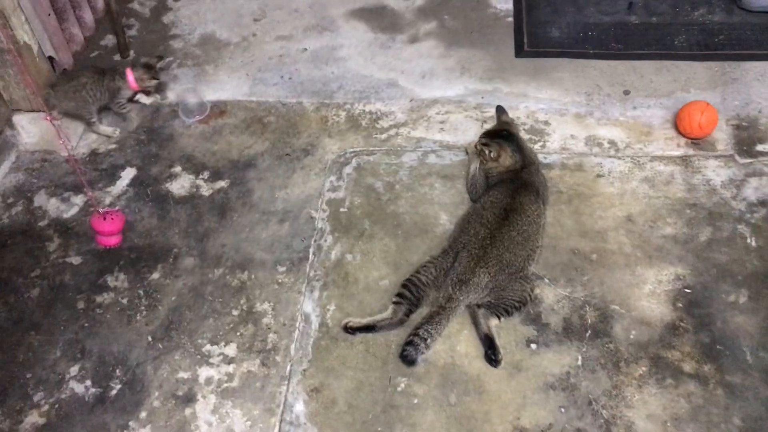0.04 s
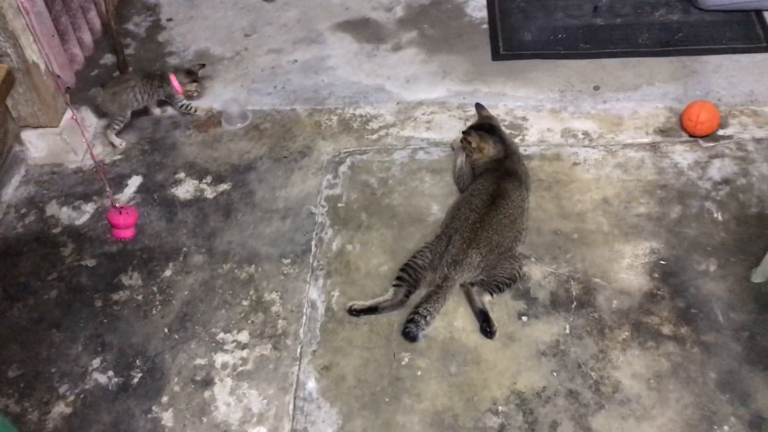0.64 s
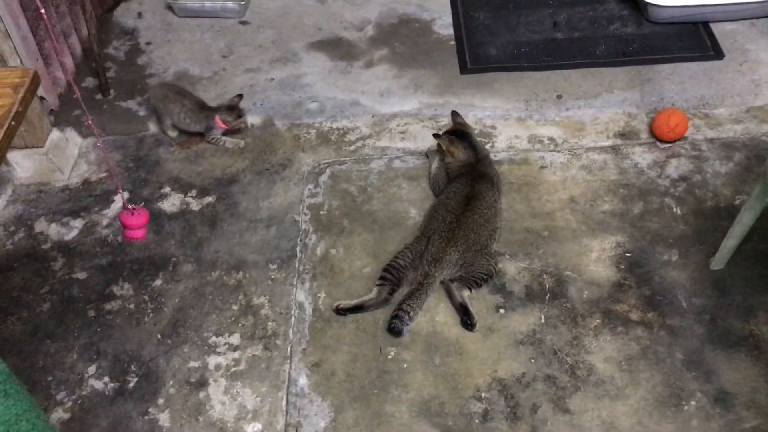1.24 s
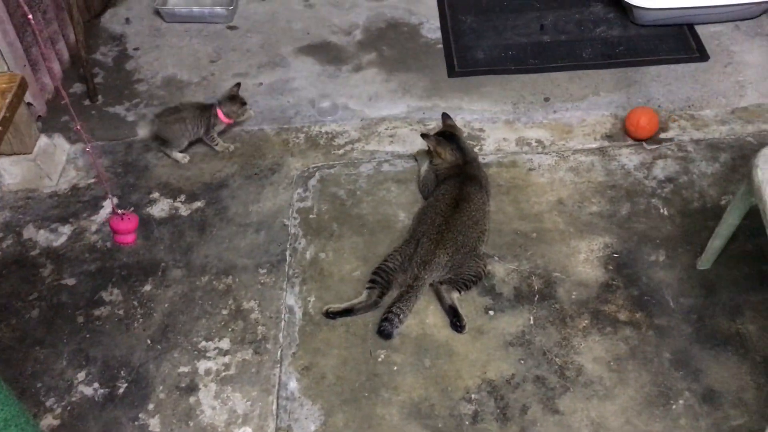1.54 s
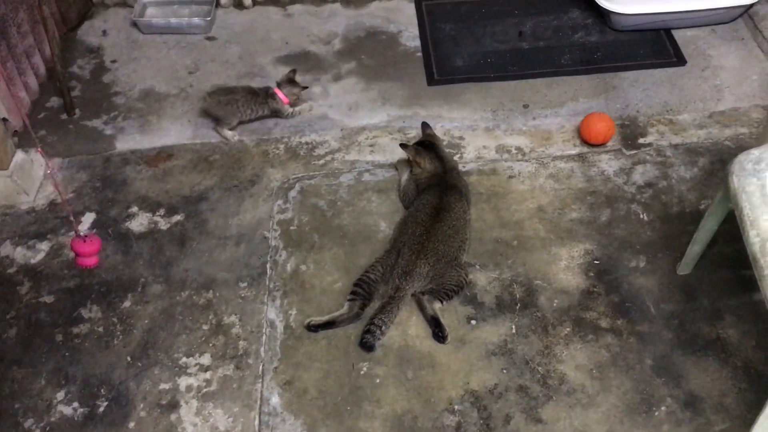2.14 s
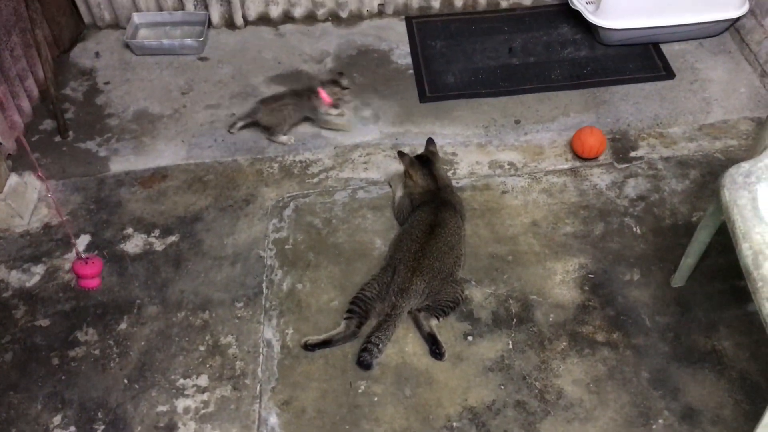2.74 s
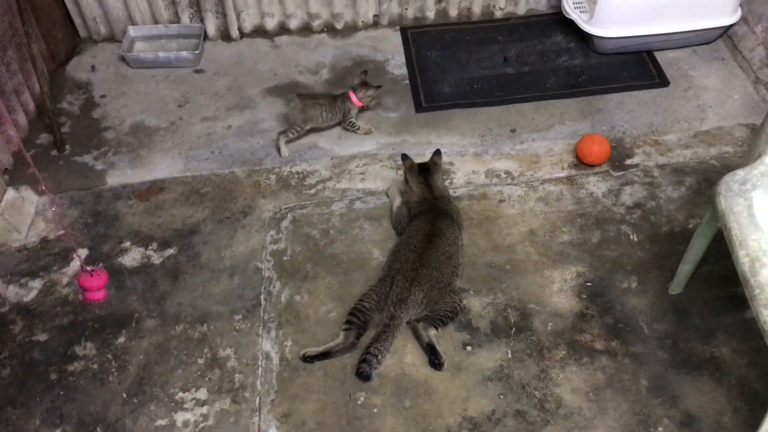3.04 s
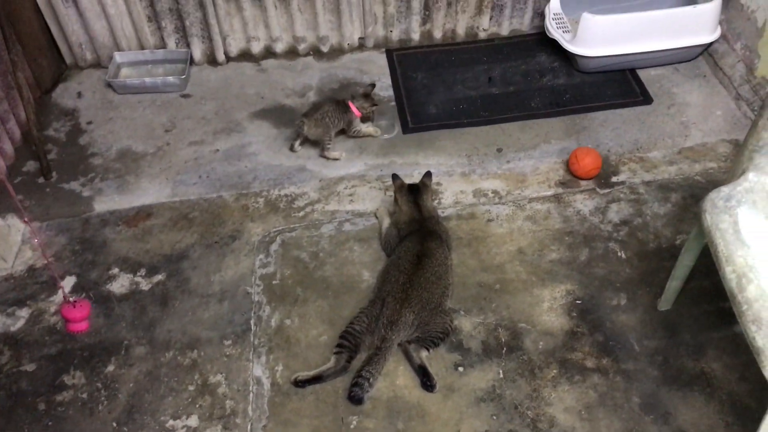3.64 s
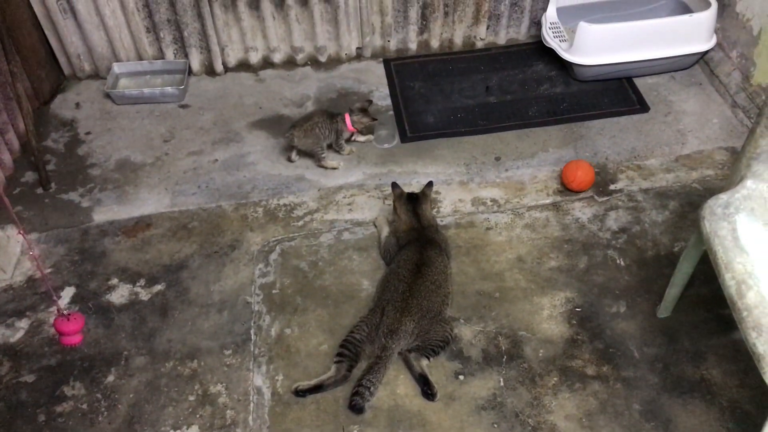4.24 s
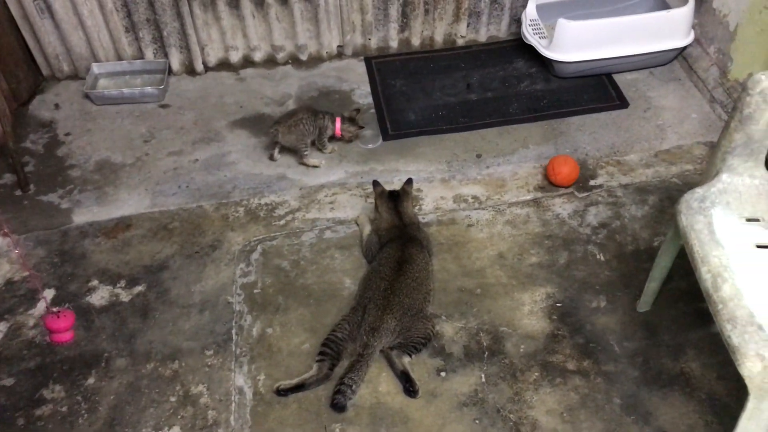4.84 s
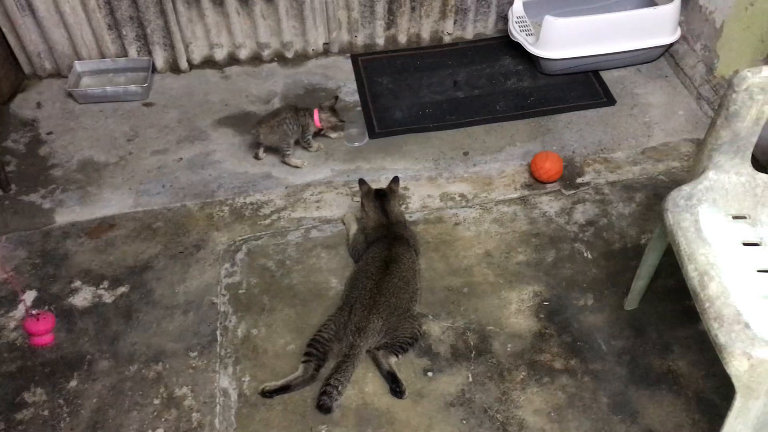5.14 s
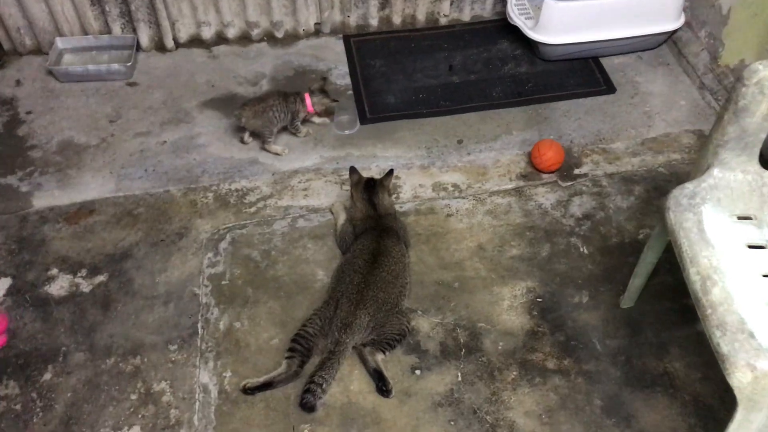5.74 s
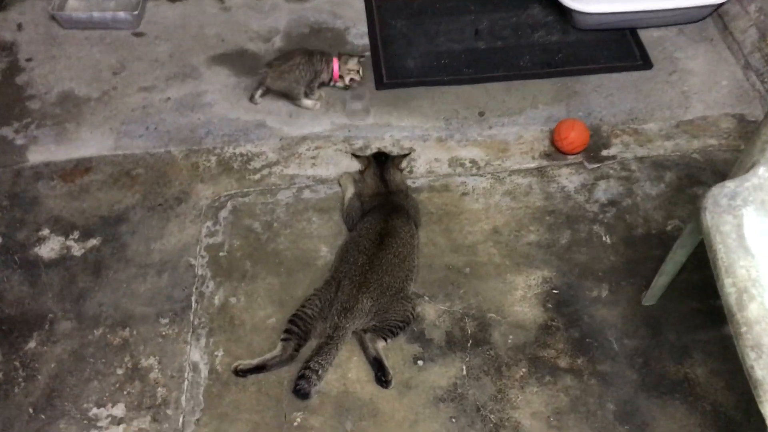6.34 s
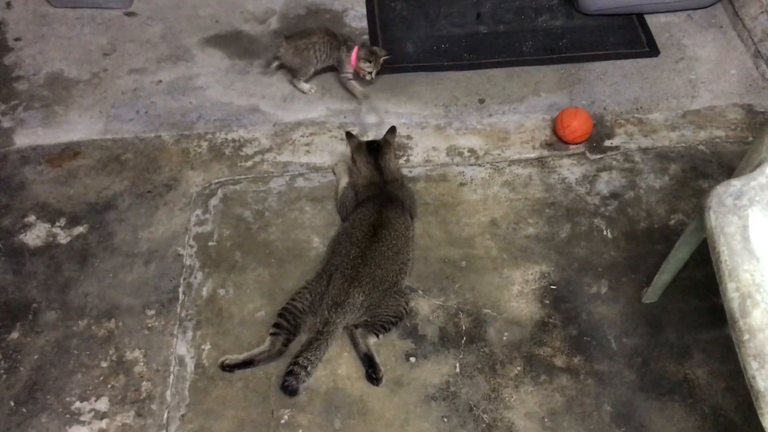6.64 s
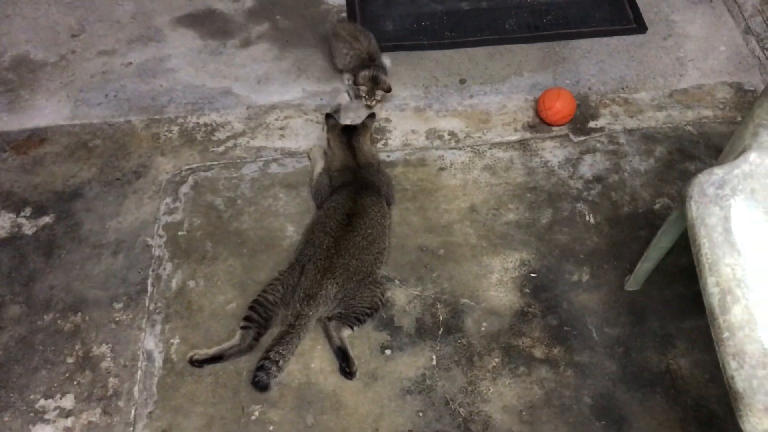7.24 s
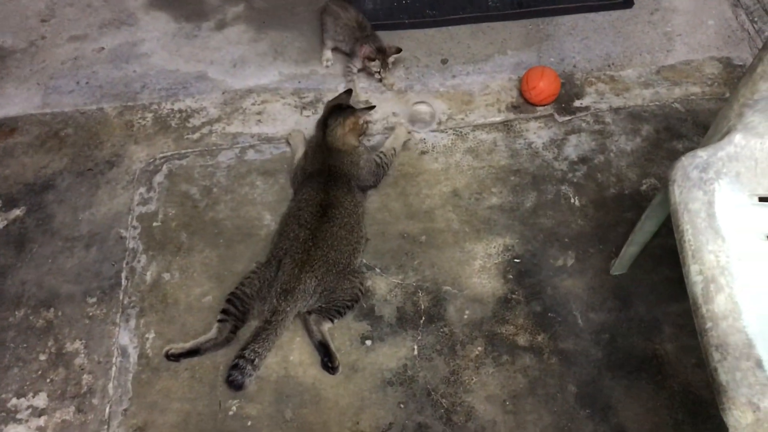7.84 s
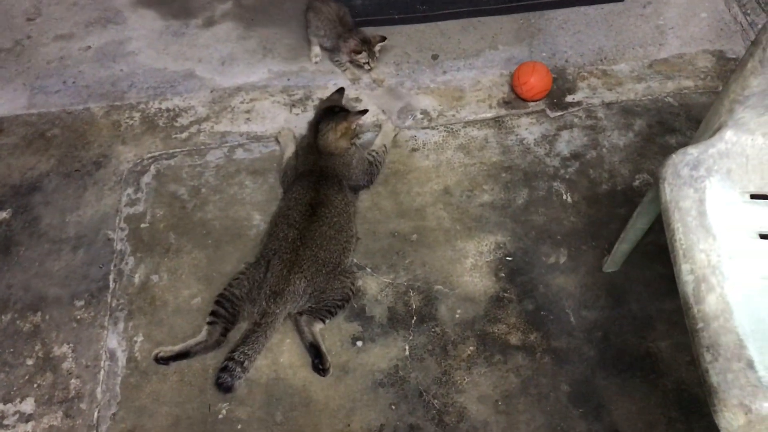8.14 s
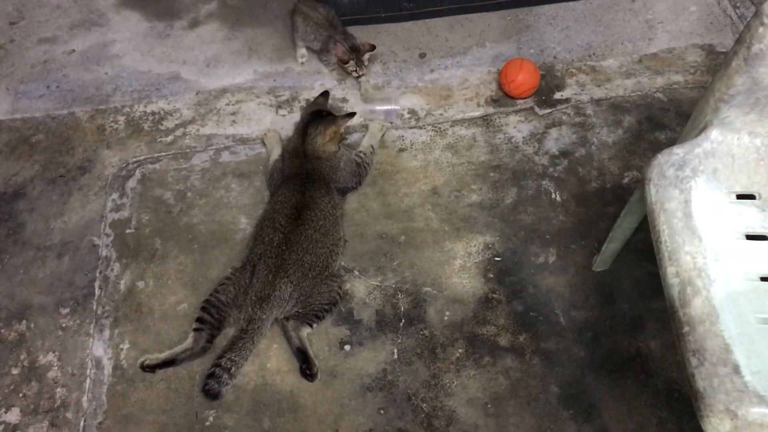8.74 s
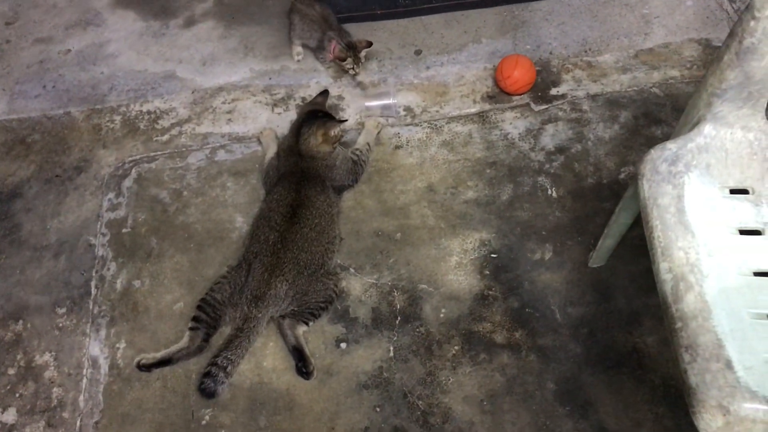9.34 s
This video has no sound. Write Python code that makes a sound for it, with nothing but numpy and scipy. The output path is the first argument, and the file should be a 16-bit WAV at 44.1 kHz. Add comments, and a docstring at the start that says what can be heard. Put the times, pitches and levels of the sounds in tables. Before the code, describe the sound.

A kitten bats a light plastic stick over concrete with scuffs, taps and claw ticks, while crickets chirp in the night.

```python
"""Kitten and stick on a night porch

A kitten pushes and bats a light hollow plastic stick over concrete: gritty scuffs, taps, claw ticks.
At last the stick is flipped and clatters down; the close walls of the roofed porch echo each contact.
A cricket chirps in threes, each wing stroke falling in pitch, over other insects, traffic and a hum."""
import sys
import numpy as np
from scipy import signal
from scipy.fft import rfft, irfft, next_fast_len
from scipy.io import wavfile
from scipy.ndimage import uniform_filter1d, map_coordinates

SR = 44100
rng = np.random.default_rng(int(sys.argv[2]) if len(sys.argv) > 2 else 0)


def bounce(signal):
    """Save signal as a 16-bit WAV file at the path given by the first command-line argument."""
    frames = np.transpose(np.atleast_2d(signal))
    limited = np.clip(frames, -1, 1)
    pcm = np.round(limited * 32767).astype(np.int16)
    wavfile.write(sys.argv[1], SR, pcm)


N = 413658

# Paw shoves. Each row: start, rise and length in seconds, relative ring and grit in dB, ring pitch in Hz.
SHOVES = [(0.168, 0.01, 0.058, -41, -50, 1170), (0.272, 0.0089, 0.042, -45, -54, 1080),
          (0.395, 0.015, 0.039, -45, -48, 1020), (0.487, 0.01, 0.067, -51, -72, 1130),
          (0.615, 0.0052, 0.047, -42, -45, 1195), (0.694, .006, 0.087, -39.5, -53, 1194),
          (0.847, 0.022, 0.14, -41.5, -44.5, 1065), (1.072, 0.0073, 0.069, -34.5, -38.5, 1170),
          (1.189, 0.014, 0.049, -43, -46.5, 1130), (1.273, 0.0043, 0.22, -38, -45, 1272),
          (1.836, .016, 0.072, -40, -46.5, 1310), (1.962, 0.0084, 0.048, -37, -50, 1170),
          (2.107, 0.036, 0.11, -39.5, -46, 1070), (2.268, 0.014, 0.064, -45.5, -60, 1025),
          (2.421, 0.037, 0.055, -37.5, -45, 1050), (2.499, 0.0088, .17, -40, -51, 1110),
          (2.689, 0.022, 0.14, -40, -46, 1087), (2.867, 0.0072, 0.098, -37.5, -45, 1203),
          (3.072, 0.009, .022, -29.5, -42, 1124), (3.129, 0.015, 0.031, -35, -46, 1176),
          (3.258, 0.0039, 0.0075, -28, -46, 1127), (3.399, 0.0039, 0.0069, -29, -44, 1215),
          (3.471, .006, 0.031, -35.5, -49.5, 1216), (3.596, 0.0044, 0.037, -39, -57, 1140),
          (3.715, 0.014, 0.022, -48, -59.5, 1050), (4.15, 0.027, 0.09, -50.5, -64, 1000),
          (4.476, 0.022, 0.038, -47.5, -60, 990), (4.745, 0.023, .055, -39, -55, 1014),
          (5.188, .014, .016, -56.5, -67, 980), (5.422, 0.026, 0.031, -35, -47, 990),
          (5.666, 0.0076, 0.012, -50.5, -64, 1010), (5.72, 0.022, 0.02, -55, -75, 980),
          (5.906, 0.026, 0.051, -34.5, -43.5, 1080), (6.25, 0.016, .062, -38, -45.5, 1045),
          (6.397, 0.009, 0.048, -37, -53, 1220), (6.567, .015, 0.12, -41, -54, 1340),
          (6.719, 0.0093, 0.073, -38.5, -49.5, 1160), (6.96, 0.018, 0.12, -47, -53, 1056),
          (7.124, 0.021, 0.088, -40, -50.5, 1050), (7.327, 0.0095, 0.051, -35.5, -43.5, 1130),
          (7.404, 0.013, .205, -37, -46.5, 1180), (7.806, 0.0064, 0.015, -36.5, -49, 1200)]
# Spectra of a contact's body, of grit and of a claw. Each row: frequency in Hz, relative density in dB.
BODY_SPECTRUM = [(420, -14), (560, 5.5), (700, 6.5), (830, 3.5), (1150, 15), (1480, 10.5), (1750, 4),
                 (2300, -7), (3200, -23.5)]
GRIT_SPECTRUM = [(1290, -31), (2200, -11), (3270, -9), (3550, -7.5), (3860, -6), (5630, 1.5), (6270, -3),
                 (8370, -10.5), (10500, -22), (13500, -22.5), (15800, -30)]
CLAW_SPECTRUM = [(600, 2), (1400, 4.5), (2500, -1), (4000, 1.5), (6000, 1.5), (9000, -1.5), (10500, -7),
                 (13000, -8), (15800, -17)]


def scuffs():
    """Each shove is a hail of catches that rings the stick; coarser grains crack under it."""
    out = np.zeros(N)
    for start_s, rise_s, length_s, ring_db, grit_db, pitch_hz in SHOVES:
        ring_gain, grit_gain = slide_gains(rise_s, length_s, ring_db, grit_db)
        samples = len(ring_gain)
        drag = catches(samples, per_s=1400, spread_db=4)
        fine = unit(catches(samples, per_s=1100, spread_db=4))
        coarse = unit(catches(samples, per_s=110, spread_db=-1))
        crunch = fine + amp(-4) * coarse
        ring = unit(hollow_ring(drag, pitch_hz, width_hz=128))
        body = amp(-2) * ring + amp(-7.5) * coloured(crunch, BODY_SPECTRUM)
        add(out, start_s, ring_gain * body + amp(3) * grit_gain * coloured(crunch, GRIT_SPECTRUM))
    return out


def taps():
    """A paw knocks the stick on the floor; held down, it rings briefly just above the nearest shove."""
    # Each row: start in seconds, relative level in dB, grit balance in dB.
    knocks = [(0.228, -37, -22), (0.625, -24.5, -10), (0.698, -25, -4), (0.867, -29, -17), (1.123, -34, 9),
              (1.146, -27, -18), (1.176, -21, -11), (1.192, -27.5, -8), (1.277, -24.5, -8.5),
              (1.344, -31.5, -1), (1.9, -29, -16), (1.971, -26.5, -7.5), (2.185, -29.5, -6),
              (2.504, -24.5, -18), (2.534, -24.5, -9.5), (2.877, -29, -8), (2.893, -21, -8),
              (3.05, -27.5, -15), (3.077, -20.5, -12), (3.262, -20, -11), (3.401, -25.5, -7),
              (3.467, -17, -13.5), (3.601, -25, -9.5), (4.811, -37, -21), (6.262, -32.5, -15),
              (6.406, -30.5, -3.5), (6.718, -25.5, -2), (6.77, -32.5, -7), (7.337, -30, -3),
              (7.809, -33, -15), (7.907, -27.5, -15)]
    low_cut = signal.butter(2, 750, "high", fs=SR, output="sos")  # too small to radiate bass
    out = np.zeros(N)
    for start_s, level_db, grit_db in knocks:
        nearest_shove = min(SHOVES, key=lambda shove: abs(shove[0] - start_s))
        pitch_hz = 1.045 * nearest_shove[-1]  # a firm paw raises the pitch
        blow = porch(contact(t60_s=0.007), tail_db=-1, early_db=1)
        bite = porch(contact(t60_s=0.0092), tail_db=0, early_db=2.5)
        ring = signal.sosfilt(low_cut, hollow_ring(blow, pitch_hz, width_hz=300, skirt_hz=400))
        body = peaked(ring) + amp(-8.5) * peaked(coloured(bite, BODY_SPECTRUM))
        grit = amp(grit_db + 5.5) * peaked(coloured(bite, GRIT_SPECTRUM))
        add(out, start_s, amp(level_db - 2.5) * (body + grit))
    return out


def claw_ticks():
    """Claws and loose grains click on concrete; the finer the point, the brighter."""
    # Each row: start in seconds, relative level in dB, tilt in dB per octave.
    ticks = [(0.1722, -36, 4), (0.4314, -30.5, -4), (0.79, -33, -1), (0.849, -31, 6), (1.0994, -32, 7),
             (1.8363, -31, 7), (1.9245, -30.5, -2.5), (2.4107, -33.5, 1.5), (2.69, -29, 6.5),
             (2.8448, -27, 5.5), (3.075, -28, 9), (3.437, -29.5, 2), (3.5048, -27.5, 0), (4.1535, -42, 8),
             (5.427, -36, 8), (5.9707, -34.5, 0), (6.315, -29, 0.5), (6.6197, -29, -1), (6.6448, -27, 4),
             (6.6824, -29.5, -0.5), (6.7211, -34, 3), (6.9606, -32.5, 8), (7.1636, -39, 7),
             (7.335, -30, 11), (8.2286, -39.5, 9), (8.312, -44, 8), (8.4158, -32, 2.5), (9.193, -39, 4.5)]
    out = np.zeros(N)
    for start_s, level_db, tilt in ticks:
        click = porch(contact(t60_s=0.017), tail_db=3, early_db=-2.5)
        spectrum = [(hz, db + tilt * np.log2(hz / 8000)) for hz, db in CLAW_SPECTRUM]
        add(out, start_s, amp(level_db - 1.5) * peaked(coloured(click, spectrum)))
    return out


def clatter(roll_corner_hz=1280):
    """Dropped free, the stick rings in all its modes, then rattles and rolls to rest."""
    # Each row: start in seconds, relative level in dB.
    bounces = [(7.8495, -21), (7.8563, -20), (7.861, -23)]
    # Each row: start, rise and length in seconds, relative ring and grit in dB.
    rolls = [(7.87, .01, 0.056, -40, -48.5), (8.009, 0.018, 0.11, -46, -65),
             (8.228, 0.0023, 0.0075, -49.5, -58.5), (8.292, 0.0037, .02, -54.5, -69),
             (8.42, 0.0028, .03, -62, -54), (8.691, 0.021, 0.11, -71, -56.5)]
    out = np.zeros(N)
    for start_s, level_db in bounces:
        blow = porch(contact(t60_s=0.0034), tail_db=1.5, early_db=-0.5)
        ring = peaked(filtered(blow, free_modes))
        click = peaked(coloured(blow, CLAW_SPECTRUM))
        add(out, start_s, amp(level_db - 1) * (ring + amp(-3.5) * click))
    for start_s, rise_s, length_s, ring_db, grit_db in rolls:
        ring_gain, grit_gain = slide_gains(rise_s, length_s, ring_db, grit_db)
        rattle = catches(len(ring_gain), per_s=260, spread_db=1)
        # Light contacts hardly wake the low modes.
        ring = unit(filtered(rattle, lambda hz: free_modes(hz) * np.minimum(hz / roll_corner_hz, 1)))
        grit = coloured(rattle, CLAW_SPECTRUM)
        add(out, start_s, amp(-0.5) * ring_gain * ring + amp(4) * grit_gain * grit)
    return out


def free_modes(hz):
    """Response of the free stick: resonances of alternating sign."""
    # Each row: centre in Hz, width in Hz, gain in dB.
    modes = [(470, 73, -8), (647, 53, 7), (1200, 220, 1.5), (1550, 126, 5), (1760, 230, -0.5),
             (2920, 400, -5.5), (3900, 480, -16), (4550, 240, -5), (5530, 1440, -11), (10000, 480, -30)]
    return sum((-1) ** k * amp(db) * 1j * hz * width / (centre ** 2 - hz ** 2 + 1j * hz * width)
               for k, (centre, width, db) in enumerate(modes))


def hollow_ring(force, pitch_hz, width_hz, skirt_hz=330):
    """The stick's hollow resonance; its pitch depends on how it lies and is held."""
    carrier = np.exp(2j * np.pi * np.cumsum(np.full(len(force), pitch_hz)) / SR)
    lowpass = np.vstack([signal.butter(1, hz, fs=SR, output="sos") for hz in (width_hz / 2, skirt_hz)])
    return (signal.sosfilt(lowpass, force / carrier) * carrier).real


def slide_gains(rise_s, length_s, ring_db, grit_db):
    """Ring and grit swell, sag as the stick slows, then die with the echo; the grit leads."""
    t = np.arange(0, length_s + 0.25, 1 / SR)
    swell = np.minimum(t / max(rise_s, 1 / SR), 1)
    sliding_s = np.maximum(np.minimum(t, length_s) - rise_s, 0)
    stopped_s = np.maximum(t - length_s, 0)
    ring = swell ** 0.86 * amp(ring_db - 18.5 * sliding_s - 234 * stopped_s)
    grit = swell ** 0.64 * amp(grit_db - 57.5 * sliding_s - 241 * stopped_s)
    return ring, grit


def catches(samples, per_s, spread_db):
    """Tiny uneven catches on rough concrete, with their echoes."""
    lead = SR // 20  # lets the echoes build up
    total = lead + samples
    hits = (rng.random(total) < per_s / SR) * rng.choice([-1, 1], total)
    sizes = amp(spread_db * np.clip(rng.standard_normal(total), -2, 2))
    return porch(hits * sizes, tail_db=-4, early_db=0)[lead:total]


def contact(t60_s):
    """A hard touch chatters for a few milliseconds."""
    t = np.arange(SR // 30) / SR
    return rng.standard_normal(len(t)) * amp(-60 * t / t60_s)


def cricket(spacing_s=0.039, stroke_s=0.03, start_hz=5820, end_hz=4880, rasp=0.26):
    """Three wing strokes a chirp; the pitch falls as each stroke slows."""
    # The sound arrives more or less directly. Each row: time in seconds, echo level in dB.
    echo_levels = [(0, 7), (3.4, 13), (4.7, -1), (6, -1), (7, 0), (9.38, 1)]
    out = np.zeros(N)
    progress = np.arange(0, 1, 1 / (stroke_s * SR))
    for time_s, level_db in chirp_times():
        chirp = np.zeros(SR // 6)
        for k, stroke_db in enumerate((-2, 0, 0)):  # the wings start softly
            hz = (start_hz + (end_hz - start_hz) * progress) * (1 + 0.00796 * rng.standard_normal())
            # The wing's file catches unevenly.
            teeth = 1 + rasp * unit(uniform_filter1d(rng.standard_normal(len(progress)), size=60))
            add(chirp, k * spacing_s, amp(stroke_db) * teeth * np.sin(np.pi * progress) * sine(hz))
        echo_db = np.interp(time_s, *np.transpose(echo_levels))
        echoed = porch(chirp, tail_db=echo_db, early_db=echo_db)
        add(out, time_s - stroke_s / 2, amp(level_db + 6) * echoed)
    return out


def chirp_times(scatter_s=0.002, scatter_db=1):
    """Time and level of each chirp: nearly even, with occasional changes of pace."""
    # Each row: start in seconds, chirp period in seconds, relative level in dB.
    paces = [(0.01, .222, -55.5), (1.325, .216, -52), (2.44, .245, -52.5), (3.678, .236, -53.5),
             (5.575, .241, -51.5), (6.74, .218, -51.5), (8.32, .234, -54)]
    ends_s = [row[0] for row in paces[1:]] + [N / SR + 0.1]
    even = np.array([(time_s, db) for (start_s, period_s, db), end_s in zip(paces, ends_s)
                     for time_s in np.arange(start_s, end_s - period_s / 2, period_s)])
    return even + rng.standard_normal(even.shape) * [scatter_s, -scatter_db]


def small_cricket(pitch_hz=7450, first_s=0.24, period_s=0.26, spacing_s=0.048, half_note_s=0.015):
    """A small cricket pipes pairs of short, nearly pure notes at an even pace."""
    # Each row: time in seconds, relative level in dB.
    levels = [(0, -79), (6.5, -81), (7.7, -79), (9.38, -79)]
    t = np.arange(N) / SR
    offset_s = (t - first_s + period_s / 4) % period_s - period_s / 4
    notes = sum(np.exp(-((offset_s - note_s) / half_note_s) ** 2) for note_s in (0, spacing_s))
    song = porch(notes * sine(pitch_hz + 25 * wobble(60)), tail_db=-4, early_db=-6)[:N]
    return amp(np.interp(t, *np.transpose(levels)) + 0.5) * unit(song)


def insect_chorus():
    """Far crickets merge into trills, each kind at its own pitch and rate; a bush-cricket lisps above."""
    # Each row: pitch in Hz, width in Hz, level in dB, pulse rate in Hz, pulse swing in dB.
    trills = [(2837, 252, -64, 25, 1), (3384, 150, -70.5, 42, 2), (4890, 240, -64, 19, 3.5),
              (5420, 330, -61, 31, 4), (5750, 320, -63.5, 15, 3.5), (7150, 96, -72, 20, 0.5),
              (6600, 550, -70.5, 24, -5), (11250, 200, -83.5, 8, 19)]
    # Each row: time in seconds, level in dB.
    lisps = [(2.4, -72), (3.2, -67), (3.64, -70), (4.03, -69), (4.43, -73)]
    t = np.arange(N) / SR
    out = np.zeros(N)
    for pitch_hz, width_hz, level_db, rate_hz, swing_db in trills:
        pulse = np.sin(2 * np.pi * (rate_hz * t + 0.4 * wobble(6)))
        out += amp(level_db) * unit(noise_band(pitch_hz, width_hz) * amp(swing_db * pulse + wobble(5)))
    lisp_gain = sum(amp(db) * np.exp(-((t - time_s) / 0.058) ** 2) for time_s, db in lisps)
    return out + lisp_gain * noise_band(centre_hz=11700, width_hz=240)


def night_background():
    """Far traffic, one vehicle that drones and fades, a wavering hum and faint hiss."""
    # Each row of both spectra: frequency in Hz, relative density in dB.
    traffic_spectrum = [(25, -41), (42, -1), (55, -3.5), (85, -2.5), (112, -4.5), (141, 0.5), (168, -6.5),
                        (200, -3.5), (260, -11), (400, -21), (600, -28.5), (800, -42)]
    hiss_spectrum = [(450, -1.5), (700, -0.5), (1150, -2), (1380, 7), (1700, -1), (2200, 0), (3800, -12),
                     (7400, -9.5), (7900, -13), (11000, -10.5), (13000, -18), (15800, -13.5)]
    # Each row: time in seconds, relative level in dB.
    vehicle_levels = [(0, -61), (2.3, -62), (3.7, -65.5), (7, -71), (9.38, -76.5)]
    t = np.arange(N) / SR
    traffic = amp(-56 + 1.2 * wobble(4)) * coloured(rng.standard_normal(N), traffic_spectrum)
    vehicle_db = np.interp(t, *np.transpose(vehicle_levels)) - 2 + 0.88 * wobble(7.4)
    vehicle = amp(vehicle_db) * noise_band(centre_hz=324.6, width_hz=23.3)
    hum = amp(-61.5 + 1.2 * wobble(5.9)) * sine(139 + 1.56 * wobble(6))
    hiss = amp(-64) * coloured(rng.standard_normal(N), hiss_spectrum)
    return traffic + vehicle + hum + hiss


def porch(x, tail_db, early_db, early_t60_s=0.099):
    """Direct sound, quick echoes off floor and walls, and a short tail."""
    # Each row: frequency in Hz, time to decay 60 dB in seconds.
    decay_times = [(200, 0.35), (1200, 0.31), (5000, 0.39), (14000, 0.21)]
    hz, frame_s, frames = signal.stft(rng.standard_normal(SR // 3), SR, nperseg=256)
    decay = amp(-60 * frame_s / log_interp(decay_times, hz)[:, None])
    tail = signal.istft(frames * decay, SR, nperseg=256)[1]
    t = np.arange(len(tail)) / SR
    early = rng.standard_normal(len(t)) * (rng.random(len(t)) < 0.05) * amp(-60 * t / early_t60_s)
    response = amp(tail_db) * tail / np.linalg.norm(tail) + amp(early_db) * early / np.linalg.norm(early)
    response[0] += 1  # direct path
    return signal.fftconvolve(x, response / np.linalg.norm(response))


def amp(db):
    """Decibels to gain."""
    return 10 ** (np.asarray(db) / 20)


def unit(x):
    """Scale to rms 1."""
    return x / np.sqrt(np.mean(np.abs(x) ** 2) + 1e-20)


def peaked(x):
    """Scale a blow so its loudest 5 ms swing to about 1."""
    return x / np.sqrt(6 * uniform_filter1d(x ** 2, size=220).max() + 1e-20)


def log_interp(points, hz):
    """Interpolate (Hz, value) points on a log axis."""
    points_hz, values = np.transpose(points)
    return np.interp(np.log(hz + 1), np.log(points_hz + 1), values)


def sine(hz):
    """A tone following a frequency curve."""
    return np.sin(2 * np.pi * np.cumsum(hz) / SR)


def wobble(knots_per_s):
    """A smooth random curve."""
    grid = np.arange(0, N + 64, 64)
    knots = rng.standard_normal(int(N * knots_per_s / SR) + 4)
    return np.interp(np.arange(N), grid, map_coordinates(knots, [grid * knots_per_s / SR]))


def filtered(x, response):
    """Apply a response given as a function of Hz."""
    size = next_fast_len(len(x) + 8192)
    return irfft(rfft(x, size) * response(np.fft.rfftfreq(size, 1 / SR)), size)[:len(x)]


def coloured(x, spectrum):
    """Shape by a (Hz, dB) spectrum, rolled off below its first point; rms 1."""
    low_hz = spectrum[0][0]
    return unit(filtered(x, lambda hz: amp(log_interp(spectrum, hz)) * np.minimum(hz / low_hz, 1) ** 2))


def noise_band(centre_hz, width_hz):
    """A bell-shaped band of noise at rms 1."""
    noise = rng.standard_normal(N)
    return unit(filtered(noise, lambda hz: np.exp(-((hz - centre_hz) / width_hz) ** 2 / 2)))


def add(track, start_s, sound):
    """Mix a sound into the track."""
    start = max(round(start_s * SR), 0)
    part = track[start:start + len(sound)]
    part += sound[:len(part)]


def scene():
    """The kitten's play in front of the night outside, in mono."""
    kitten = scuffs() + taps() + claw_ticks() + clatter()
    return (kitten + cricket() + small_cricket() + insect_chorus() + night_background())[None]


def record(dry):
    """A sharp treble cut."""
    cutoff_hz = 15850
    return np.array([filtered(channel, lambda hz: hz < cutoff_hz) for channel in dry])


dry = scene()
out = record(dry)
bounce(out)
```